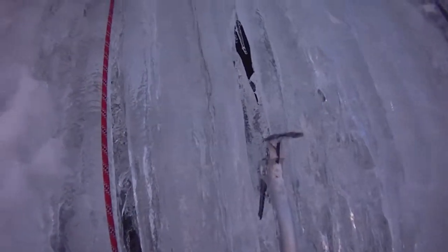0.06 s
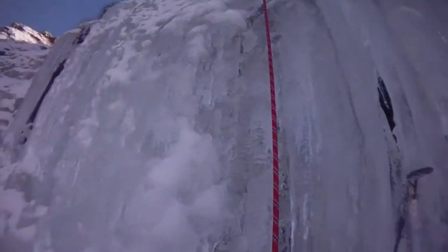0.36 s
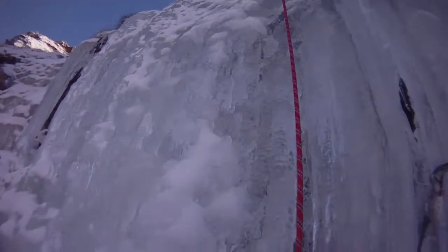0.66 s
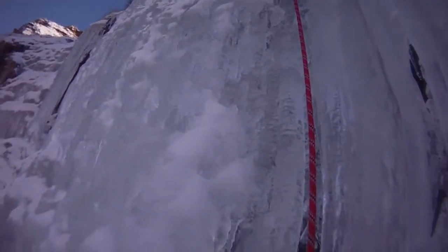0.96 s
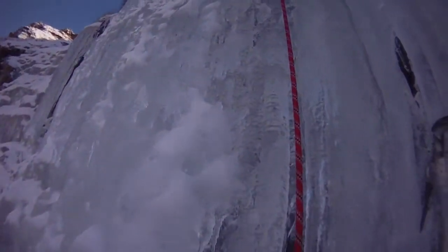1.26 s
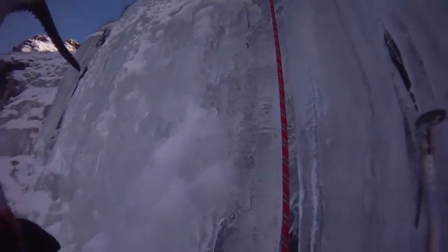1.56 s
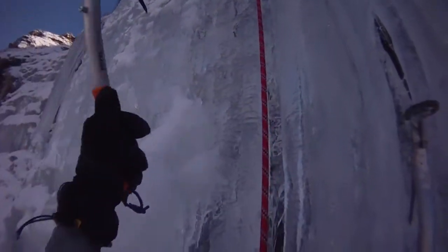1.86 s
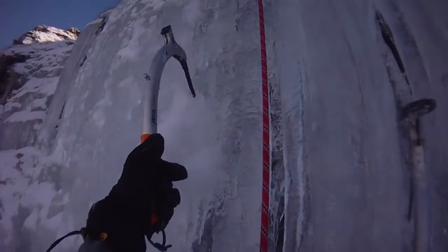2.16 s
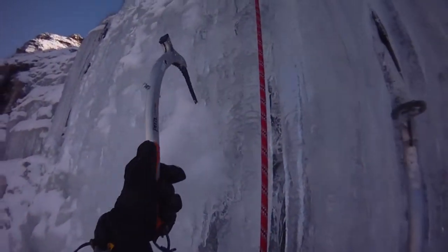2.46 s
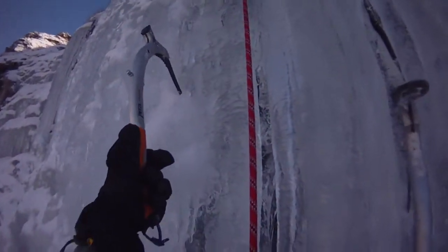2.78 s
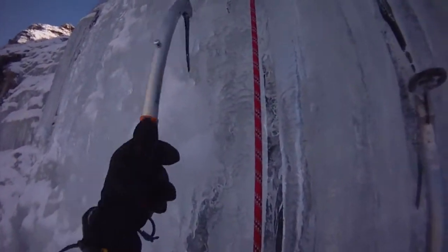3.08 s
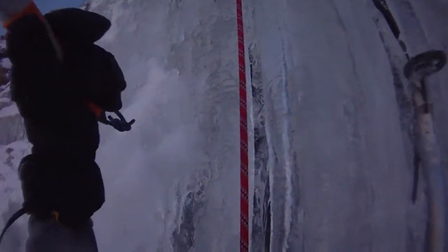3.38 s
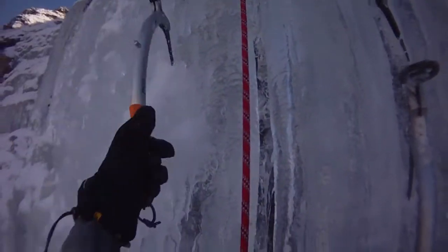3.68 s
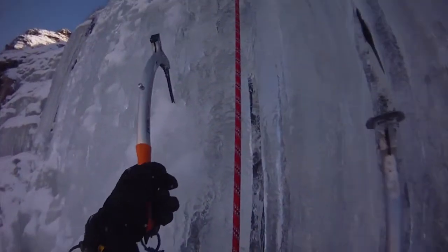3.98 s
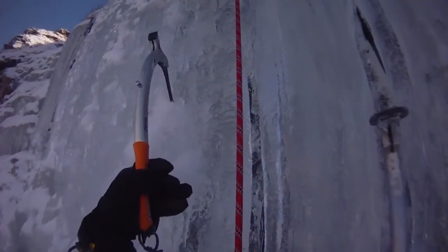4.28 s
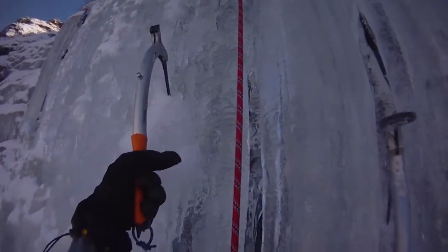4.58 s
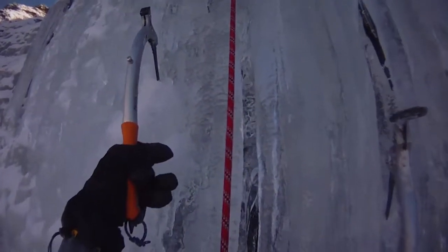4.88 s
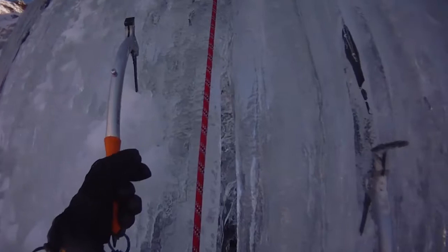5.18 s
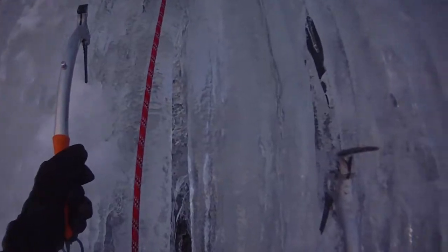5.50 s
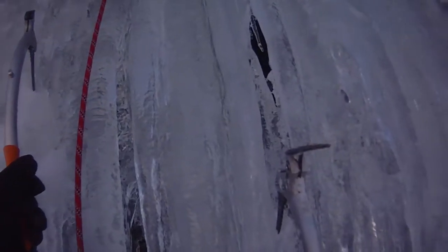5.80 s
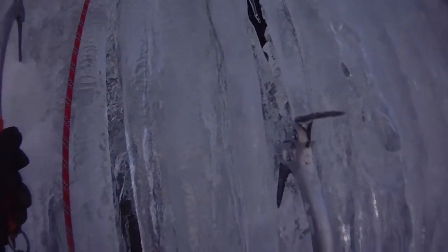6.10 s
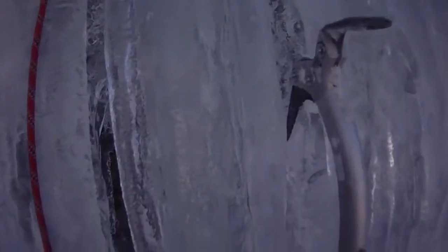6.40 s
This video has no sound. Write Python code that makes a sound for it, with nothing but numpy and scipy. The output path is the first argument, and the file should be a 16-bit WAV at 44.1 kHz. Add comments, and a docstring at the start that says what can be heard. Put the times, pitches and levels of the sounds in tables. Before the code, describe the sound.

An ice axe knocks and crunches into a frozen waterfall in a few separate blows, with a brittle snap and faint clothing rustle.

```python
"""First, hiss, faint air rumble and the soft lens-drive ticks of a camera worn by an ice climber.
Dull knocks thud through the frozen waterfall and loose ice clacks. The axe's steel pick crushes ice
and rings briefly; twice a brittle piece snaps close by. Jolts shake the camera, clothing rustles,
and a shift of grip makes a run of faint knocks."""
import sys
import numpy as np
from scipy import signal
from scipy.fft import rfft, irfft, next_fast_len
from scipy.io import wavfile

SR = 44100
rng = np.random.default_rng(int(sys.argv[2]) if len(sys.argv) > 2 else 0)


def file_out(sig):
    """Save sig as 16-bit WAV at sys.argv[1]."""
    # one column per channel
    cols = np.atleast_2d(sig).T
    # limit, then scale
    lim = np.clip(cols, -1, 1)
    pcm = np.round(lim * 32767).astype(np.int16)
    wavfile.write(sys.argv[1], SR, pcm)


N = 293116
HIT_TIME_S = np.arange(SR // 5) / SR

# pick bites (time [s], level [dB], crunch rise [s], crunch decay [s], low-pass [Hz])
PICK_BITES = [(1.9563, -44, .0006, 0.0074, 12000), (1.9653, -36, 0.00046, 0.0018, 6340),
              (1.9854, -42.5, .006, 0.0037, 6000), (2.6632, -48.5, .0002, 0.005, 5000),
              (3.0674, -50.5, .001, 0.0015, 14000), (3.6749, -32.5, 0.00022, 0.0033, 8200),
              (4.1036, -48.5, .0005, 0.0014, 3300)]
# steel axe modes (frequency [Hz], width [Hz], level [dB])
AXE_MODES = [(1970, 72, -1.5), (2230, 33, -5.5), (2350, 56, -1.5), (2650, 38, -7), (2990, 79, -1.5),
             (3320, 65, -3.5), (3980, 140, -3.5), (4270, 69, 2), (4500, 200, -5.5), (5900, 140, -6.5),
             (6850, 190, 2), (7600, 71, -15), (10200, 200, -13), (12400, 180, -18)]
# dull knocks (time [s], level [dB], grit re knock [dB])
ICE_KNOCKS = [(0.254, -55.5, -20), (0.371, -56, -5), (1.342, -42.5, -34), (1.4603, -42, -34),
              (1.9344, -43, -33), (2.0343, -42.5, -34), (2.672, -35.5, -18), (3.0803, -48.5, -30),
              (3.7150, -32, -13), (3.8304, -32.5, -14), (4.662, -53.5, -20), (5.059, -50.5, -20),
              (5.597, -50.5, -7)]
# ice body modes (frequency [Hz], width [Hz], level [dB])
ICE_MODES = [(156, 103, -3), (241.4, 76, 2.5), (260, 89, -12.5), (365, 41, -22.5)]
# hollow ice sheet modes (frequency [Hz], width [Hz], level [dB])
SHEET_MODES = [(542, 47, -4), (706, 83, 2.5), (906, 38, -11)]
# contact grit spectrum (frequency [Hz], level [dB])
GRIT_SPECTRUM = [(400, 2.5), (900, -1.5), (1700, -1.5), (3000, -7), (6000, -25), (14000, -30)]
# brittle breaks (time [s], level [dB], low-pass [Hz], pitch [ratio])
BREAKS = [(4.0848, -27.3, 14500, 1), (4.3010, -43, 15000, .87)]
# snapped piece modes (frequency [Hz], width [Hz], level [dB])
SNAP_MODES = [(267, 140, -24), (520, 98, -16), (730, 43, -16), (1650, 98, -12.5), (2540, 170, -7),
              (2880, 85, -6.5), (3490, 170, -5), (4290, 42, -12), (4800, 150, -8), (5460, 220, -1),
              (6000, 350, -5), (6400, 200, -15), (7560, 310, -1), (8580, 210, -10), (9660, 440, -6),
              (11400, 380, -8), (12600, 340, -3.5), (15200, 750, -1)]
# taps on loose ice (time [s], level [dB])
CHUNK_TAPS = [(0.5866, -45), (2.011, -49)]
# loose ice modes (frequency [Hz], width [Hz], level [dB])
CHUNK_MODES = [(836, 51, 3), (1080, 150, -5), (1760, 150, -8), (2210, 180, -14)]
# body jolts (time [s], level [dB])
BODY_JOLTS = [(0.552, -50), (1.295, -51), (1.86, -49), (1.975, -43.5), (3.078, -47), (3.665, -42.5),
              (3.704, -36), (3.831, -46.5)]
# sleeve and glove rubs (time [s], length [s], level [dB])
CLOTH_RUBS = [(.632, 0.057, -53.5), (0.7, 0.077, -55), (0.832, .035, -60), (1.87, 0.17, -57),
              (3.71, 0.24, -60), (4.741, 0.11, -64), (5.075, 0.08, -58.5), (5.195, 0.31, -65),
              (5.697, 0.081, -56), (6.063, 0.24, -57.5), (6.345, 0.22, -59)]
# cloth spectrum (frequency [Hz], level [dB])
CLOTH_SPECTRUM = [(70, -7), (130, -2), (180, -7.5), (240, 3), (340, -4), (480, -7.5), (750, -5.5),
                  (1200, -19), (3000, -26), (12000, -53)]
# lens motor steps (time in cycle [s], chance [0-1])
MOTOR_STEPS = [(.018, 1), (.069, .3), (.119, 1), (.168, .4), (.219, .2), (.269, 1), (.369, 1)]
# camera housing modes (frequency [Hz], width [Hz], level [dB])
HOUSING_MODES = [(5205, 340, -4.5), (5980, 320, -4.5), (7170, 520, -4.5), (8300, 620, -7),
                 (9230, 1040, -8.5), (10920, 260, -5.5), (12040, 290, 0), (12700, 260, -4.5),
                 (14550, 830, -6.5)]
# microphone hiss spectrum (frequency [Hz], level [dB])
HISS_SPECTRUM = [(75, -7.5), (120, 0), (170, -1.5), (230, 0.5), (450, -2.5), (850, -1), (1100, -2),
                 (1600, -2), (3000, -4.5), (5000, -6.5), (7000, -7), (10000, -8.5), (15000, -8.5)]
# hiss stereo width (frequency [Hz], side re mid [dB])
HISS_WIDTH = [(50, -50), (150, -55), (300, -28.5), (600, -17.5), (2200, -21), (4500, -8.5), (8000, -3.5),
              (15000, -3.6)]
# air rumble spectrum (frequency [Hz], level [dB])
AIR_SPECTRUM = [(12, -10), (24, -7), (42, 2), (52, -6.5), (65, -20), (90, -36), (200, -35)]


def from_db(db):
    """Decibels to gain."""
    return 10 ** (np.asarray(db) / 20)


def unit_rms(x):
    """Scale to rms 1."""
    return x / np.sqrt(np.mean(x ** 2) + 1e-20)


def unit_hit(x):
    """Scale to the energy of 10 ms at rms 1."""
    return x / np.sqrt(np.sum(x ** 2) / (SR / 100) + 1e-20)


def add(track, time_s, sound):
    """Mix a sound in at time_s."""
    start = max(0, round(time_s * SR))
    track[start:start + len(sound)] += sound[:N - start]


def bin_gains(spectrum, size):
    """FFT bin gains from (Hz, dB) points, interpolated in log frequency."""
    hz, db = np.transpose(spectrum)
    bins_hz = np.fft.rfftfreq(size, 1 / SR)
    return from_db(np.interp(np.log(bins_hz + 1), np.log(hz), db))


def noise(spectrum, size=N):
    """Coloured noise, rms 1."""
    padded = next_fast_len(size)
    shaped = rfft(rng.standard_normal(padded)) * bin_gains(spectrum, padded)
    return unit_rms(irfft(shaped, padded)[:size])


def resonate(x, hz, width_hz):
    """One resonance, peak gain 1."""
    r = np.exp(-np.pi * width_hz / SR)
    gain = (1 - r * r) / 2
    return signal.lfilter([gain, 0, -gain], [1, -2 * r * np.cos(2 * np.pi * hz / SR), r * r], x)


def lowpass(x, hz):
    """Two-pole low-pass."""
    return signal.sosfilt(signal.butter(2, hz, fs=SR, output="sos"), x)


def flicker(depth_db, rate_hz):
    """Random gain around 1."""
    return from_db(depth_db * unit_rms(lowpass(rng.standard_normal(N), rate_hz)))


def strike(force, modes, scatter_db):
    """A force rings all modes, neighbours in opposite sign; levels scatter per blow."""
    ring = 0
    for k, (hz, width_hz, db) in enumerate(modes):
        gain = from_db(db + scatter_db * rng.standard_normal())
        ring += (-1) ** k * gain * unit_hit(resonate(force, hz, width_hz))
    return unit_hit(ring)


def crunch(rise_s, decay_s):
    """Ice gives way in a dying run of tiny fractures."""
    envelope = (1 - np.exp(-HIT_TIME_S / rise_s)) * np.exp(-HIT_TIME_S / decay_s)
    return envelope * rng.standard_normal(len(HIT_TIME_S))


def axe_pick(chips_db=-5.0):
    """The pick crushes ice; the crushing rings the steel."""
    out = np.zeros(N)
    for time_s, db, rise_s, decay_s, lowpass_hz in PICK_BITES:
        force = crunch(rise_s, decay_s)
        chips = from_db(chips_db) * unit_hit(resonate(force, hz=4300, width_hz=3600))
        steel = strike(force, AXE_MODES, scatter_db=0)
        add(out, time_s, from_db(db) * unit_hit(lowpass(steel + chips, lowpass_hz)))
    return out


def ice_knocks(grit_decay_s=0.004, sheet_db=-14.5):
    """Blunt blows: grit at the contact, a low thud, then the sheet's hollow ring."""
    out = np.zeros(N)
    push = resonate(signal.unit_impulse(len(HIT_TIME_S)), hz=205, width_hz=230)
    for time_s, db, grit_db in list(ICE_KNOCKS) + grip_knocks():
        grit = unit_hit(noise(GRIT_SPECTRUM, len(HIT_TIME_S)) * np.exp(-HIT_TIME_S / grit_decay_s))
        sheet_force = lowpass(crunch(rise_s=0.005, decay_s=0.0051), hz=980)
        sheet = strike(sheet_force, SHEET_MODES, scatter_db=2.0)
        thud = strike(push, ICE_MODES, scatter_db=1.5)
        add(out, time_s, from_db(db) * (thud + from_db(grit_db) * grit + from_db(sheet_db) * sheet))
    return out


def grip_knocks(count=5, start_s=5.225, gap_s=0.056, jitter_s=0.004, level_db=-57.5, grit_db=-22):
    """The hand shifts grip: faint uneven knocks, rows as in ICE_KNOCKS."""
    return [(start_s + k * gap_s + jitter_s * late, level_db + louder_db, grit_db)
            for k, (late, louder_db) in enumerate(rng.standard_normal((count, 2)))]


def snaps(splinter_db=-10.0):
    """A brittle break rings the piece, splinters follow; larger pieces ring lower."""
    out = np.zeros(N)
    click = signal.unit_impulse(len(HIT_TIME_S))
    for time_s, db, lowpass_hz, pitch in BREAKS:
        modes = [(hz * pitch, width_hz, mode_db) for hz, width_hz, mode_db in SNAP_MODES]
        ring = strike(click, modes, scatter_db=0.5)
        fractures = crunch(rise_s=0.00044, decay_s=0.002)
        splinters = from_db(splinter_db) * unit_hit(resonate(fractures, hz=5560, width_hz=7400))
        add(out, time_s, from_db(db) * unit_hit(lowpass(ring + splinters, lowpass_hz)))
    return out


def ice_clacks():
    """Loose ice, tapped, rings hollow."""
    out = np.zeros(N)
    for time_s, db in CHUNK_TAPS:
        tap = lowpass(crunch(rise_s=0.0013, decay_s=0.0031), hz=2200)
        add(out, time_s, from_db(db) * strike(tap, CHUNK_MODES, scatter_db=2.5))
    return out


def body_jolts(sway_hz=41, rise_s=0.018):
    """Each jolt shakes the camera for a few cycles."""
    out = np.zeros(N)
    swell = HIT_TIME_S * np.exp(-HIT_TIME_S / rise_s)
    sway = swell / swell.max() * np.sin(2 * np.pi * sway_hz * HIT_TIME_S)
    for time_s, db in BODY_JOLTS:
        add(out, time_s, from_db(db) * sway)
    return out


def clothing():
    """Sleeves and gloves rub in short grainy strokes."""
    strokes = np.zeros(N)
    for time_s, length_s, db in CLOTH_RUBS:
        add(strokes, time_s, from_db(db) * signal.windows.tukey(int(length_s * SR), 0.7))
    return strokes * flicker(depth_db=0.5, rate_hz=59) * noise(CLOTH_SPECTRUM)


def lens_effort(cycle_s=0.4004, sigma_s=0.0077, jitter_s=0.002, step_db=8, scatter_db=0.9, run_db=9):
    """Envelope of the hunting motor: cyclic steps, broken by one rest and one longer run."""
    rest_s, run_s, resume_s = 1.0, 1.262, 1.345
    effort = np.zeros(N)
    around_s = np.arange(-SR // 25, SR // 25) / SR
    swell = np.exp(-0.5 * (around_s / sigma_s) ** 2)
    for start_s in np.arange(0, N / SR, cycle_s):
        for offset_s, chance in MOTOR_STEPS:
            late, louder = rng.standard_normal(2)
            time_s = start_s + offset_s + jitter_s * late
            if rng.random() < chance and time_s < N / SR and not rest_s < time_s < resume_s:
                step = from_db(step_db + scatter_db * louder) * swell[time_s + around_s >= 0]
                add(effort, time_s + around_s[0], step)
    add(effort, run_s, from_db(run_db) * signal.windows.tukey(int((resume_s - run_s) * SR), 0.4))
    return effort


def lens_drive(gain_db=-50.5, spread=0.35, pan_db=2.5, pan_ref_hz=13000):
    """Motor steps rasp in the housing; its high modes sit nearer the right microphone."""
    friction = lens_effort() * (rng.standard_normal(N) + spread * rng.standard_normal((2, N)))
    housing = np.zeros((2, N))
    for k, (hz, width_hz, db) in enumerate(HOUSING_MODES):
        lean_db = np.array([[-pan_db], [pan_db]]) * (hz / pan_ref_hz) ** 2
        housing += (-1) ** k * from_db(db + lean_db) * resonate(friction, hz, width_hz)
    return from_db(gain_db) * housing


def background(hiss_db=-54, whine_db=-70.5, air_db=-61.5, pan_db=0.05):
    """Microphone hiss, wider in the treble; a thin whine; low unsteady air."""
    width = bin_gains(HISS_WIDTH, N)
    mid = irfft(rfft(noise(HISS_SPECTRUM)) / np.hypot(1, width), N)
    side = irfft(rfft(noise(HISS_SPECTRUM)) * width / np.hypot(1, width), N)
    hiss = np.array([mid + side, mid - side]) * from_db([[-pan_db], [pan_db]])
    whine = unit_rms(resonate(rng.standard_normal(N), hz=7770, width_hz=50))
    air = noise(AIR_SPECTRUM) * flicker(depth_db=1.0, rate_hz=3.8)
    return from_db(hiss_db) * hiss + from_db(whine_db) * whine + from_db(air_db) * air


def scene():
    """Open air, no echo; all blows straight ahead."""
    climbing = axe_pick() + ice_knocks() + snaps() + ice_clacks() + body_jolts() + clothing()
    return climbing + lens_drive() + background()


def record(dry, ceiling=0.4, cutoff_hz=15300):
    """Soft peak limit, then a steep treble cut."""
    rounded = ceiling * np.tanh(dry / ceiling)
    return signal.sosfilt(signal.ellip(12, 0.1, 70, cutoff_hz, fs=SR, output="sos"), rounded)


dry = scene()
out = record(dry)
file_out(out)
```